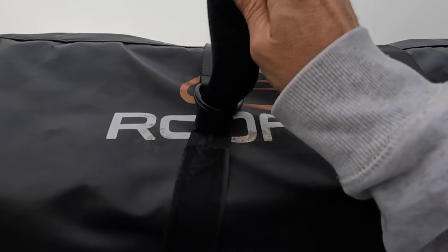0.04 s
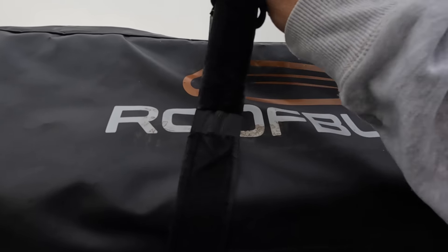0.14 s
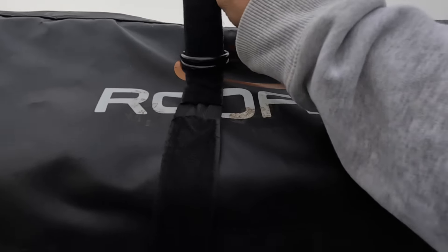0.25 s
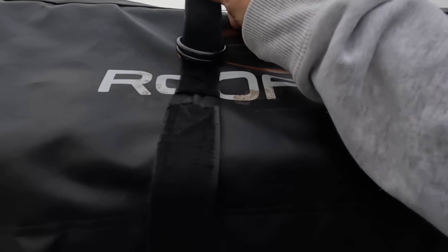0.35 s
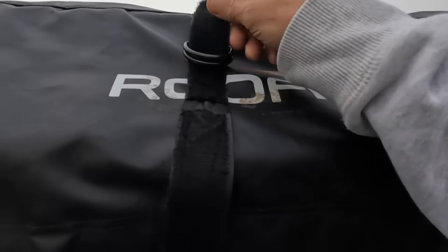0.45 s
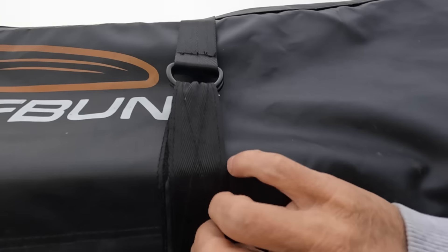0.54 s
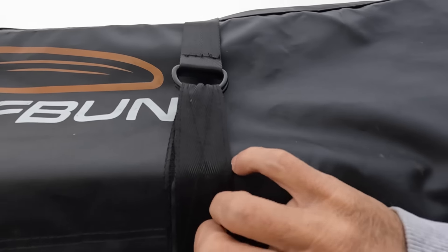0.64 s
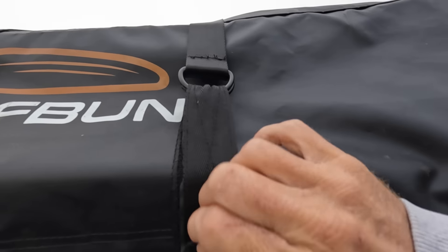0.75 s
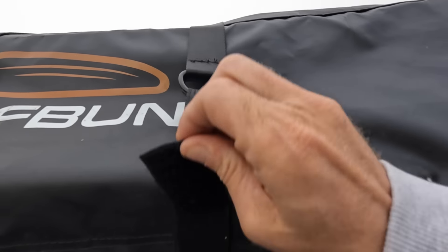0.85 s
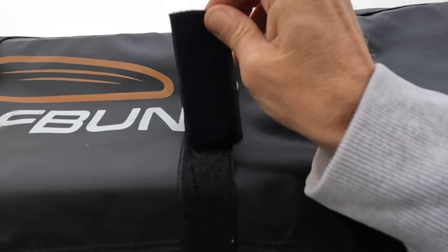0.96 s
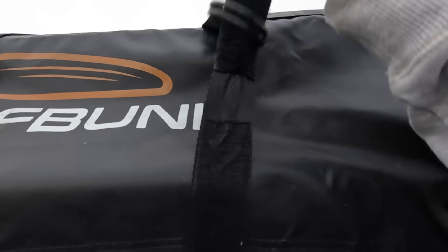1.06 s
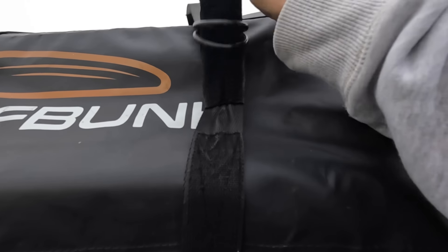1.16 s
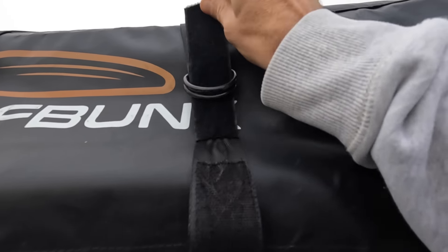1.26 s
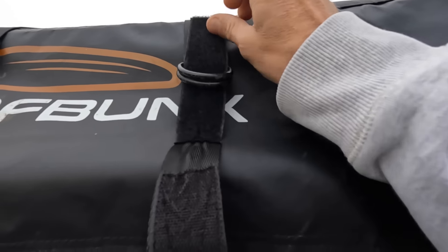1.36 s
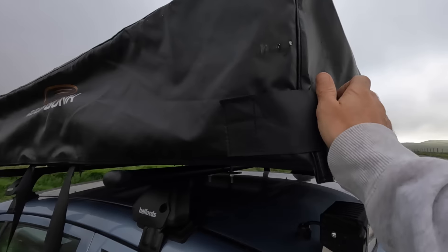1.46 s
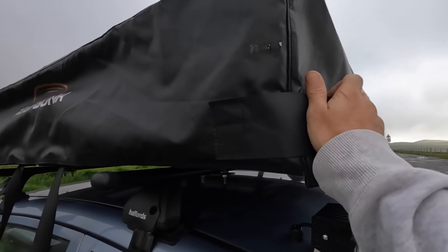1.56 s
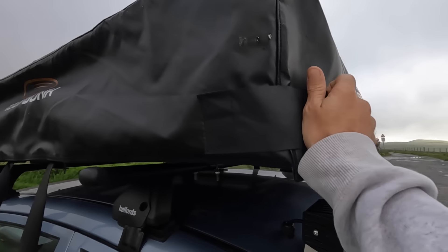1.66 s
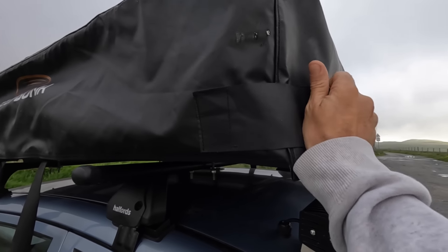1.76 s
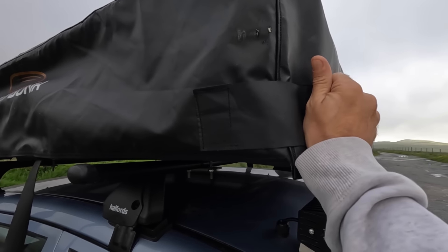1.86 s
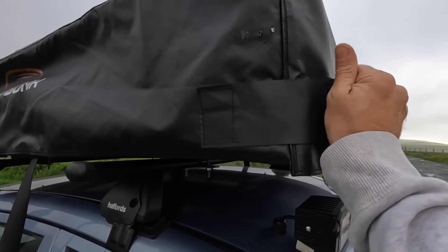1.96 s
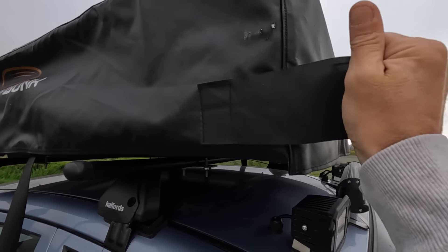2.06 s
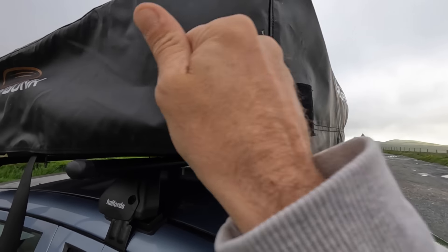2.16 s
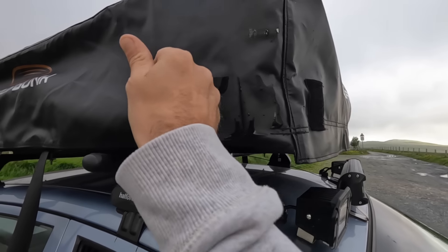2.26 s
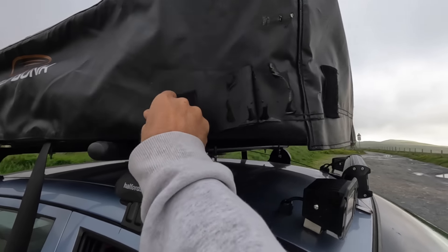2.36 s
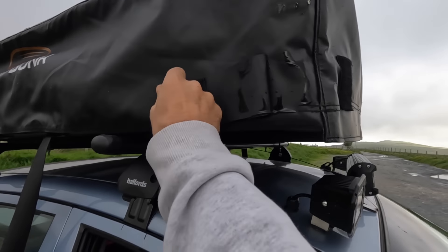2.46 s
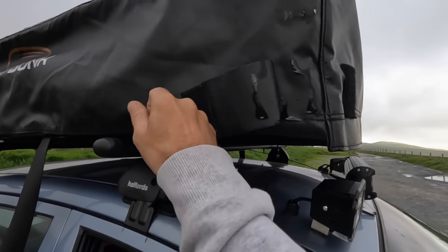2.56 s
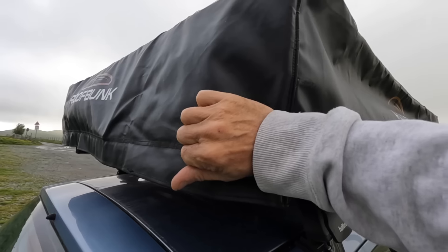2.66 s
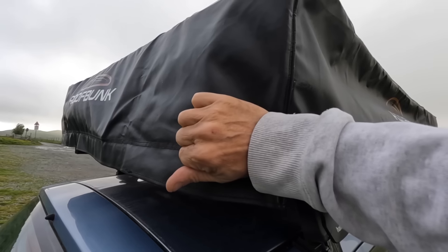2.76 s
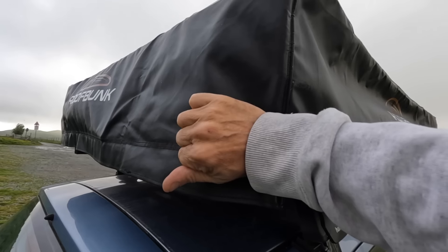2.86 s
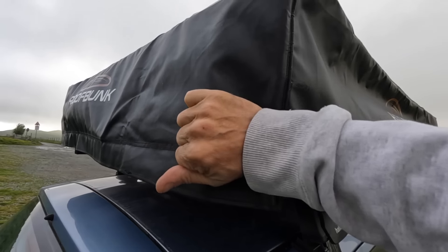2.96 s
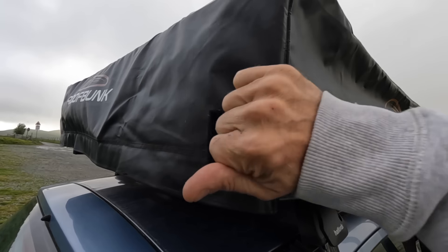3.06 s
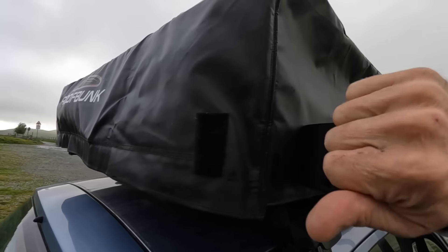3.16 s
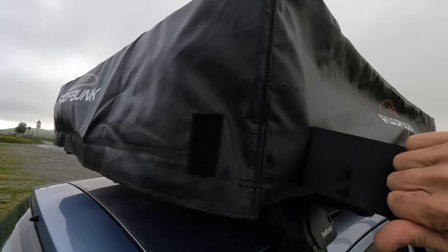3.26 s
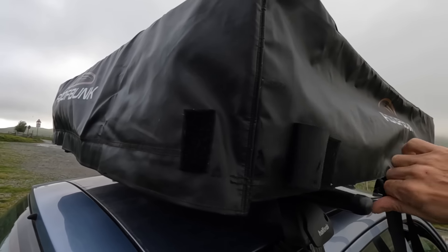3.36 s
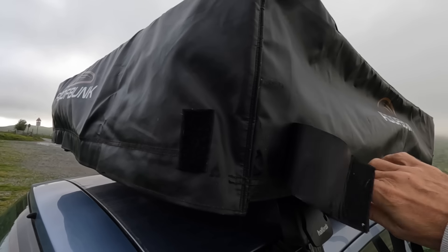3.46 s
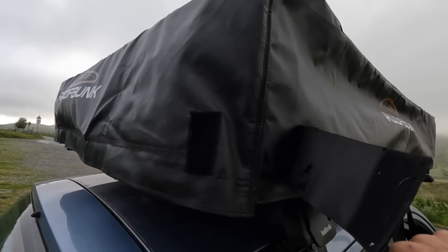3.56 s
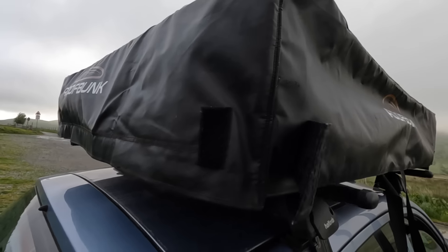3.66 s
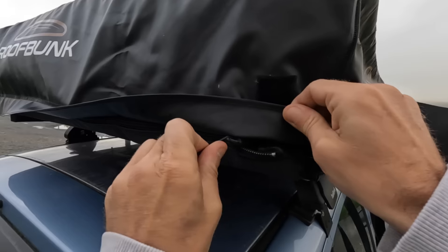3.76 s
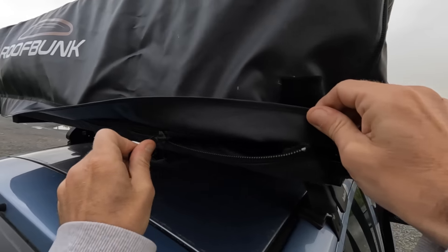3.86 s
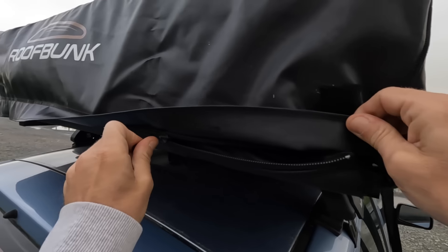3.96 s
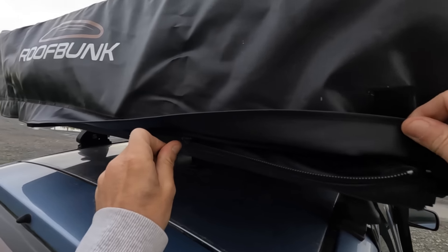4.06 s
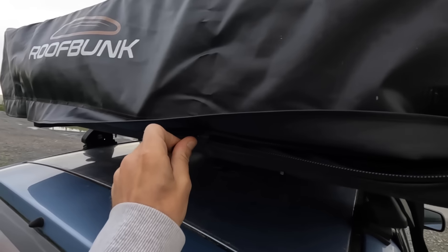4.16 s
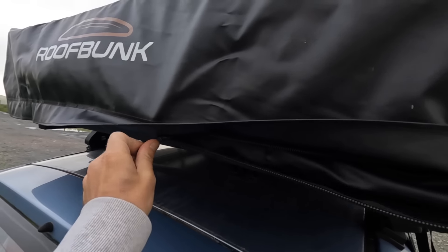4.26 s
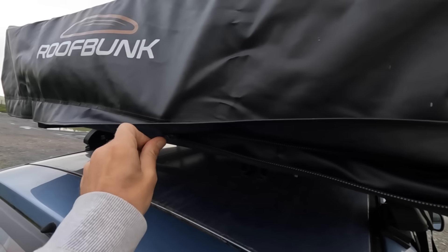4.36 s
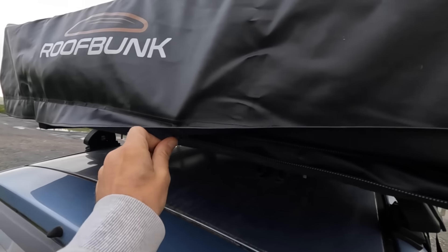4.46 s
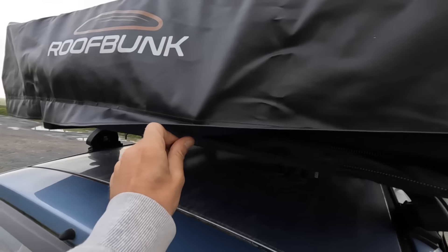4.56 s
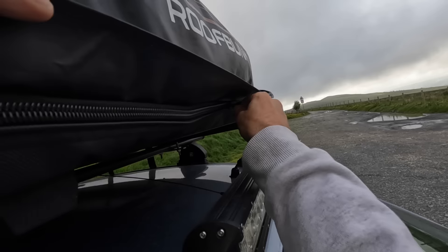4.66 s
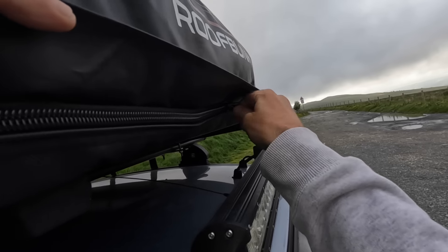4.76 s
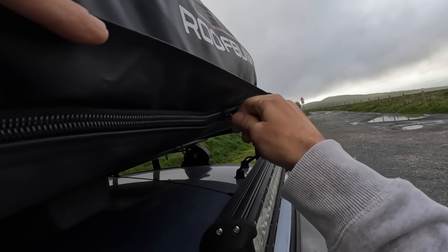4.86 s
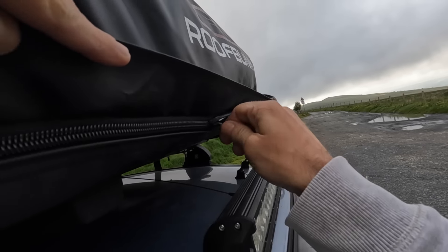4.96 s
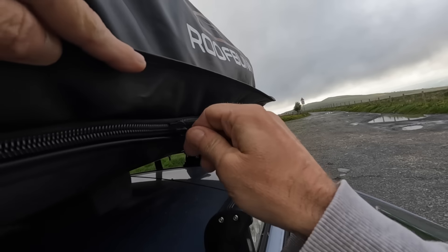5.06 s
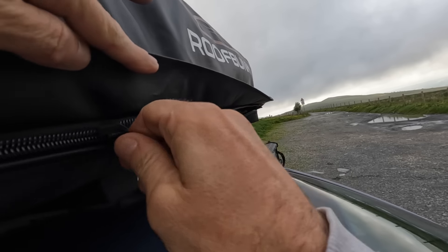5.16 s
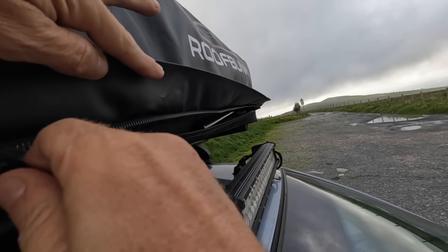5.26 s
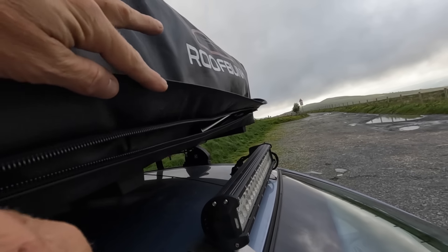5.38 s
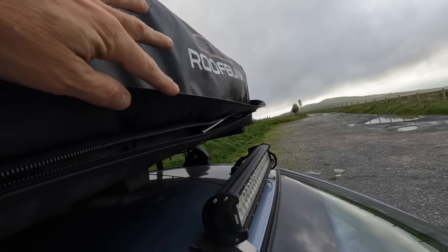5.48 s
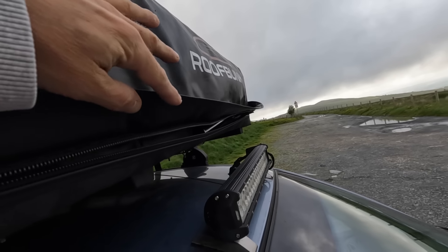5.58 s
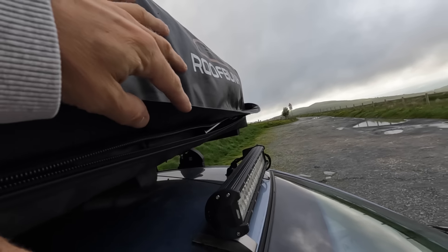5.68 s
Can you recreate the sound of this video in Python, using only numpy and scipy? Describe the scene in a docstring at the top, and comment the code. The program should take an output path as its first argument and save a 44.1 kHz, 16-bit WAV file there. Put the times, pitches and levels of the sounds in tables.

```python
"""Vinyl roof-tent cover being opened

Hook-and-loop straps and flaps tear as random hook impulses; steel rings clink as sums of decaying modes.
A coarse zip runs in two short strokes and a long one: tooth ticks gate noise, and their rate sounds as a hum.
The vinyl cover drums and rustles as filtered random impulses and thumps as falling sine bursts.
Low-pitched noise is the wind buffeting two microphone ports; brief random echoes surround the nearer sounds."""
import sys
import numpy as np
from scipy import signal
from scipy.fft import rfft, irfft, next_fast_len
from scipy.io import wavfile
from scipy.ndimage import uniform_filter1d, map_coordinates

SR = 44100
rng = np.random.default_rng(int(sys.argv[2]) if len(sys.argv) > 2 else 0)


def transcribe(signal):
    """Save signal, clipped to [-1, 1], as a 16-bit WAV file at the path in sys.argv[1]."""
    frames = np.atleast_2d(signal).T
    limited = np.clip(frames, -1, 1)
    pcm = np.round(limited * 32767).astype(np.int16)
    wavfile.write(sys.argv[1], SR, pcm)


N = 252340
T = np.arange(N) / SR  # time [s]

# tears of each fastening: (start [s], end [s], build-up [s], relative level [dB])
NARROW_TEARS = [(0.0, .156, .095, -18), (.815, 1.127, 0.036, -20)]
WIDE_TEARS = [(1.995, 2.165, .13, -17.5), (2.448, 2.494, 0.011, -30.5), (2.975, 3.031, 0.02, -27.5),
              (3.057, 3.153, 0.029, -17), (3.394, 3.428, 0.011, -24)]
TEAR_SWELL_DB, TEAR_STOP_DB_PER_S = 10, 2010  # rise during the build-up, then a steep fall after the end
# loudest single hooks letting go: (time [s], relative level [dB], pitch [Hz])
HOOK_SNAPS = [(.6994, -7, 4060), (.743, -15, 5340), (.7708, -8.5, 3780), (.7813, -12, 5230),
              (.8116, -12, 3210), (1.8434, -8, 3020), (1.8537, -6, 2780), (1.8642, -14, 2680),
              (1.8968, -2, 3600), (1.9032, -4.5, 2760), (1.9067, -10, 3580), (1.9265, -2.5, 3020),
              (1.9596, -10, 3730), (1.9872, -19, 3430), (2.0012, -9.5, 2640), (2.0168, -5.5, 3450),
              (2.0474, -0.5, 2770), (2.4723, -3.5, 2140), (2.5022, -14.5, 4020), (2.8376, -9.5, 2770),
              (2.8463, -7, 2070), (2.8681, -10, 2720), (2.9085, -9.5, 2570), (2.9504, -11, 2520),
              (2.9616, -8.5, 2730), (2.9728, -9, 2530), (2.9986, -3, 2390), (3.014, -3.5, 2370),
              (3.026, -18, 2000), (3.0384, -13.5, 3460), (3.0479, -14, 2800), (3.0595, -2, 2570),
              (3.464, -4, 3600)]

# slider speed, one list per stroke: (time [s], speed [teeth/s])
SLIDER_SPEED = [
    [(3.8, 70), (3.88, 150), (3.92, 430), (3.95, 630), (3.97, 745), (3.985, 590), (4.03, 210), (4.15, 110)],
    [(4.243, 80), (4.28, 230), (4.31, 390), (4.365, 520), (4.385, 360), (4.42, 100)],
    [(4.74, 50), (4.82, 150), (4.89, 290), (5.0, 265), (5.07, 300), (5.135, 410), (5.2, 480), (5.265, 410),
     (5.3, 270), (5.405, 415), (5.48, 180), (5.58, 165)],
]
# one row per stroke: (relative level at reference speed [dB], level drift by the end of the stroke [dB],
# hum offset [dB])
STROKE_LEVELS = [(-31.5, -2, 1.5), (-28.5, -3.5, 0.5), (-29, 6.5, -2.5)]
REFERENCE_SPEED = 400  # teeth/s
SPEED_LAW_DB = 22.5  # louder by this much at ten times the speed
SLIDE = .25  # smooth sliding added to the tooth ticks, whose nominal height is 1
# the slider passes to the left: (time [s], left minus right level [dB])
SLIDER_BALANCE = [(5.05, 0), (5.3, 2.5), (5.46, 4.5)]
# the slider catches and its tab knocks: (time [s], relative level [dB], pitch [Hz])
SLIDER_CATCHES = [(3.81, -18.5, 824), (3.883, -14, 785), (3.922, -14.5, 1060), (4.594, -10, 2060),
                  (4.679, -20.5, 750), (5.585, -6.5, 880), (5.618, -25.5, 888), (5.629, -4.5, 928),
                  (5.671, -30.5, 1030)]
# share of the scrape taken up by the loose cover: (time [s], relative level [dB])
COVER_UPTAKE = [(3.8, -12), (4.4, 2.5), (4.85, -9), (5.1, -20.5), (5.35, 2), (5.58, 7)]

# strap rings touching: (time [s], relative level [dB])
RING_CLINKS = [(0.258, -12), (1.2207, -11), (1.3422, -19)]
# modes of the steel rings: (frequency [Hz], mean relative level [dB], 60 dB decay time [s])
STEEL_MODES = [(4270, 1, 0.028), (5130, 5.5, 0.045), (5710, 0.5, 0.057), (6340, 0.5, 0.045),
               (6560, -18, .072), (7360, -8, 0.077), (7270, -17, .25), (13390, -15, 0.07),
               (14760, -14.5, 0.081)]

# the cover jerks: (time [s], relative level [dB])
COVER_THUMPS = [(.164, -12), (0.198, -13.5), (0.775, -13.5), (.833, -5.5), (2.071, -8.5), (2.181, -3),
                (2.267, -19.5), (2.474, -6), (3.147, -3.5), (3.376, -18), (3.463, -12.5), (3.81, -20),
                (3.999, -11), (5.581, -8.5), (5.625, -5)]
# a hand tugs the cover and it drums: (middle [s], length [s], relative level [dB])
HAND_TUGS = [(1.18, 0.085, -30), (2.23, 0.057, -34), (2.48, 0.021, -23), (3.44, .1, -36.5),
             (3.85, 0.058, -25), (4.15, 0.35, -29.5), (4.85, 0.24, -33.5), (5.58, 0.16, -27.5)]
# the sleeve brushes the vinyl: (middle [s], length [s], relative level [dB])
SLEEVE_BRUSHES = [(.21, 0.088, -40), (.365, 0.044, -45), (.53, 0.1, -47), (.76, 0.086, -42.5),
                  (1.19, 0.055, -36.5), (1.4, 0.11, -42.5), (1.585, 0.054, -44), (1.76, 0.13, -44),
                  (1.92, 0.094, -42), (2.26, 0.093, -52), (2.48, 0.072, -37.5), (2.85, 0.073, -52),
                  (2.99, 0.074, -47.5), (3.25, 0.084, -66.5), (3.41, 0.06, -37.5), (3.59, 0.028, -59),
                  (4.19, 0.066, -60), (4.62, .11, -43.5)]
RESTING_RUB_DB, RESTING_WANDER_DB = -63, 3  # the cover never lies quite still
# drumming offset for each kind of excitation
DRUM_BY_STRAP_DB, DRUM_BY_FLAP_DB, DRUM_BY_BRUSH_DB = 0.5, -9, 7
# small dry ticks: (time [s], relative level [dB])
DRY_TICKS = [(1.166, -22), (1.4047, -37), (1.489, -17), (2.3327, -30), (2.6365, -33.5), (2.687, -40),
             (2.7811, -30), (3.333, -39), (3.548, -19), (3.5985, -20.5)]
TICK_HZ = 3840

# wind buffeting: (time [s], relative level [dB])
WIND_LEVEL = [(0.0, -26.5), (0.54, -36.5), (1.15, -26.5), (1.45, -40.5), (1.53, -20.5), (2.02, -43),
              (2.17, -24.5), (2.44, -49.5), (2.47, -22), (2.6, -45.5), (2.8, -33), (2.93, -46.5),
              (3.17, -28), (3.23, -41), (3.44, -29), (3.53, -37.5), (4.08, -26), (4.97, -34), (5.11, -21.5),
              (5.19, -38), (5.24, -30), (5.53, -37.5), (5.58, -26.5), (5.72, -43.5)]
# spans in which the nearly mono sound opens to stereo: (start [s], end [s])
STEREO_SPANS = [(1.46, 3.78), (4.68, 5.73)]

# source spectra: (frequency [Hz], relative density [dB per Hz])
NARROW_SPECTRUM = [(260, -38.5), (450, -3.5), (589, -13), (684, -6), (748, -12), (1560, -7.5), (1780, -10),
                   (3090, -2.5), (3990, -4), (4560, -3.5), (7690, -11), (9630, -23), (12600, -22),
                   (15100, -34), (16000, -41.5)]
WIDE_SPECTRUM = [(180, -8.5), (300, -8), (713, -5.5), (787, -9.5), (994, -2), (1690, -5), (1810, -2.5),
                 (2400, -1.5), (3350, -1.5), (4750, -7.5), (5900, -7.5), (11300, -22.5), (12900, -35),
                 (16000, -54.5)]
RASP_SPECTRUM = [(290, -51.5), (500, -24.5), (562, -22), (855, -6.5), (919, -3), (1130, -3.5), (1690, -6),
                 (1840, -5), (2290, -6.5), (4470, -17.5), (7420, -24), (8960, -33), (12000, -39.5),
                 (14000, -51.5), (16000, -55)]
VINYL_SPECTRUM = [(350, -47), (600, -5.5), (1160, 1.5), (1460, -2), (2070, -3), (5250, -5.5),
                  (10000, -20.5), (13700, -31.5), (15000, -62)]
DRUM_SPECTRUM = [(50, -40.5), (100, 0), (160, 1), (300, -8), (450, -16), (800, -26), (2000, -68),
                 (6000, -120)]
BUFFET_SPECTRUM = [(10, -1), (25, 3), (45, -3), (80, -6.5), (130, -18), (300, -42), (1000, -73.5),
                   (4000, -120)]
AIR_SPECTRUM = [(120, -27), (200, 24), (443, -23), (818, -19.5), (2850, -20.5), (4980, -42), (12300, -31),
                (15000, -52)]
# slider scrape as it sounds in the cover: (frequency [Hz], relative density [dB per Hz])
BODY_SPECTRUM = [(150, -24.5), (400, -23.5), (800, -3), (1200, -8.5), (2000, -14), (5000, -41),
                 (12000, -100)]
# stray sound that differs between the ports: (frequency [Hz], gain [dB])
SCATTER_GAIN = [(100, -20), (500, -11), (2000, -10.5), (5000, -9.5), (8000, -17), (12000, 1.5)]
# how well the cover radiates the hum: (frequency [Hz], gain [dB])
PANEL_GAIN = [(150, 7.5), (280, -1), (450, -2.5), (580, -4), (750, 1.5), (930, 8), (1200, 0), (2000, -2.5),
              (4000, -8)]
# softening of every click by the fabric: (frequency [Hz], gain [dB])
FABRIC_DAMPING = [(100, -30), (500, 0), (7000, -1), (12000, -4), (16000, -19.5)]
TOP_HZ, CEILING = 16000, .75  # band limit, and the amplitude to which peaks are rounded


def amp(db):
    """Logarithmic level: decibels become an amplitude ratio."""
    return 10 ** (np.asarray(db) / 20)


def unit(x):
    """Power normalisation: scale to an rms of 1."""
    return x / np.sqrt(np.mean(x ** 2) + 1e-20)


def along(points, hz):
    """Logarithmic frequency scale: interpolate (frequency [Hz], value) points."""
    f, v = np.transpose(points)
    return np.interp(np.log(hz + 1), np.log(f + 1), v)


def level(rows):
    """Amplitude envelope: (time [s], level [dB]) rows become a gain, falling to -120 dB outside them."""
    db = np.interp(T, *np.transpose(rows), left=-120, right=-120)
    return uniform_filter1d(amp(db), size=90)


def wobble(rate):
    """Slow random modulation: a smooth curve through random knots, rate of them a second."""
    return map_coordinates(rng.standard_normal(int(N * rate / SR) + 4), [T * rate])


def colour(x, spectrum):
    """Minimum-phase filtering: a causal response is found by folding the cepstrum of the spectrum."""
    m = 2 * next_fast_len(N // 2 + 8192)
    gain = amp(along(spectrum, np.fft.rfftfreq(m, 1 / SR)))
    cepstrum = irfft(np.log(gain + 1e-6))
    cepstrum[1:m // 2] *= 2
    cepstrum[m // 2 + 1:] = 0
    return irfft(rfft(x, m) * np.exp(rfft(cepstrum)), m)[..., :N]


def noise(spectrum):
    """Coloured noise: filtered Gaussian noise with an rms of 1."""
    return unit(colour(rng.standard_normal(N), spectrum))


def crackle(rate, spread_db):
    """Poisson-like shot noise: sparse impulses of uneven size, with power held level as the rate varies."""
    sizes = amp(spread_db * np.clip(rng.standard_normal(N), -2, 2))
    signed = sizes * rng.choice([-1, 1], N)
    return unit(signed * (rng.random(N) < rate / SR) / np.sqrt(rate))


def shifting(x, depth_db, size, count):
    """Moving resonance: flexing fabric gives random gain patches, size bins wide and count frames long."""
    z = signal.stft(x, nperseg=256)[2]
    field = uniform_filter1d(rng.standard_normal(z.shape), size, 0)
    field = uniform_filter1d(field, count, 1)
    return unit(signal.istft(z * amp(depth_db * unit(field)), nperseg=256)[1][:N])


def add(track, s, sound):
    """Superposition: add a sound to the track at time s."""
    part = track[max(round(s * SR), 0):][:len(sound)]
    part += sound[:len(part)]


def place(x, lag, pan_db):
    """Interaural-style cues: the left port lags by some samples and is louder by pan_db."""
    turn = np.exp(-1j * np.pi * np.fft.rfftfreq(N) * lag)
    left, right = irfft(rfft(x) * np.array([turn, 1 / turn]), N)
    return np.array([left * amp(pan_db / 2), right * amp(-pan_db / 2)])


def swells(moves):
    """Gaussian envelopes: hand movements swell and fade evenly."""
    return sum(amp(db) * np.exp(-2 * ((T - middle) / length) ** 2) for middle, length, db in moves)


def tearing(tears):
    """Peeling force: the pull on the hooks builds, holds and stops when the strip comes free."""
    pull = np.zeros(N)
    for start, end, build, db in tears:
        rise_db = TEAR_SWELL_DB * np.clip((T - start) / build - 1, -1, 0)
        fall_db = TEAR_STOP_DB_PER_S * np.maximum(T - end, 0)
        pull += (T >= start) * amp(db + rise_db - fall_db)
    return pull


def tear(tears, spectrum, hook_rate, spread_db, clump_db, fuzz, shift_db):
    """Stochastic fracture: hooks let go in clumps over a fuzz of loops, faster under a harder pull."""
    pull = tearing(tears)
    rate = hook_rate * np.clip(pull / pull.max(), .03, 1) ** 1.4
    hooks = crackle(rate, spread_db) + fuzz * rng.standard_normal(N)
    clumped = hooks * amp(clump_db * wobble(330))
    return pull * shifting(colour(clumped, spectrum), shift_db, size=4, count=16)


def clicks(events, ring_t60, grit, tail_db, tail_t60, spectrum):
    """Impulsive excitation: each event gives a decaying sine with grit and a short noise rattle."""
    out, t = np.zeros(N), np.arange(SR // 20) / SR
    rough = noise(spectrum)
    for s, db, hz in events:
        rattle = rough[rng.integers(N - len(t)):][:len(t)]
        click = (np.sin(2 * np.pi * hz * t) + grit * rattle) * amp(-60 * t / ring_t60)
        click += rattle * amp(tail_db - 60 * t / tail_t60)
        # every onset falls about 1 ms after its listed time
        add(out, s + 0.001056, amp(db) * click / np.abs(click).max())
    return colour(out, FABRIC_DAMPING)


def straps(ring_hz=3750, width_hz=500, ring_db=-5):
    """Resonant fracture: two narrow straps rip straight ahead, and their taut webbing rings."""
    rip = tear(NARROW_TEARS, NARROW_SPECTRUM, hook_rate=4500, spread_db=3.0, clump_db=1.0,
               fuzz=0.27, shift_db=3.5)
    ring = signal.lfilter(*signal.iirpeak(ring_hz, ring_hz / width_hz, SR), rip)
    return np.tile(amp(-1) * rip + amp(ring_db) * ring, (2, 1))


def cover_thumps():
    """Membrane relaxation: the pitch of each decaying sine sags as the panel goes slack."""
    thumps, t = np.zeros(N), np.arange(SR // 10) / SR
    for s, db in COVER_THUMPS:
        hz = (135 + 420 * np.exp(-t / 0.0025)) * amp(rng.normal(0, 1.6))
        thump = np.sin(2 * np.pi * np.cumsum(hz) / SR)
        add(thumps, s + 0.0013, amp(db - 5.5 - 60 * t / .021) * thump)  # onset 1.3 ms late
    return thumps


def cover():
    """Membrane and friction noise: the vinyl drums when shaken, thumps and hisses; small dry ticks fall among
    its sounds."""
    brushing = swells(SLEEVE_BRUSHES) + amp(RESTING_RUB_DB + RESTING_WANDER_DB * wobble(8.6))
    ripping = amp(DRUM_BY_STRAP_DB) * tearing(NARROW_TEARS) + amp(DRUM_BY_FLAP_DB) * tearing(WIDE_TEARS)
    shaking = swells(HAND_TUGS) + ripping + amp(DRUM_BY_BRUSH_DB) * brushing
    drum = shaking * unit(colour(crackle(450, spread_db=5.5), DRUM_SPECTRUM))
    fibres = crackle(2500, spread_db=12.0) + 0.86 * rng.standard_normal(N)
    rub = brushing * shifting(colour(fibres, VINYL_SPECTRUM), depth_db=2.5, size=9, count=40)
    tick_events = [(s, db, TICK_HZ) for s, db in DRY_TICKS]
    ticks = amp(-1) * clicks(tick_events, ring_t60=0.0018, grit=0.76, tail_db=-11.5, tail_t60=.024,
                             spectrum=WIDE_SPECTRUM)
    return place(amp(-3) * drum + amp(-3) * rub + ticks + cover_thumps(), lag=0.91, pan_db=-.5)


def scatter(x, t60=.018, late_db=-18, late_t60=.17):
    """Diffuse reflection: car and cover return a brief echo, different at each port; ground adds a tail."""
    t = np.arange(SR // 6) / SR
    decay = amp(-60 * t / t60) + amp(late_db - 60 * t / late_t60)
    echo = rng.standard_normal((2, len(t))) * decay
    reflected = signal.fftconvolve(x, echo / np.linalg.norm(echo[0]), axes=1)[:, :N]
    return colour(reflected, SCATTER_GAIN)


def wind():
    """Turbulent pressure: gusts buffet the ports, partly each on its own, over a faint outdoor hush."""
    own = np.array([noise(BUFFET_SPECTRUM), noise(BUFFET_SPECTRUM)])
    buffets = unit(noise(BUFFET_SPECTRUM) + 0.4 * own)
    return amp(2.0) * level(WIND_LEVEL) * buffets + amp(-59.5) * noise(AIR_SPECTRUM)


def rings():
    """Modal vibration: steel rings clatter, each contact striking the modes at new strengths."""
    out, t = np.zeros(N), np.arange(SR // 3) / SR
    for s, db in RING_CLINKS:
        ring = np.zeros(len(t))
        for hz, mode_db, t60 in STEEL_MODES:
            decay = amp(mode_db + rng.normal(0, 2.5) - 60 * t / t60)
            ring += decay * np.sin(2 * np.pi * hz * t + rng.uniform(0, 2 * np.pi))
        # a short noise burst at the contact
        ring += 1.73 * noise(NARROW_SPECTRUM)[:len(t)] * amp(-60 * t / 0.028)
        add(out, s + 0.0013, amp(db - 2.5) * ring / np.abs(ring).max())  # onset 1.3 ms late
    return np.tile(out, (2, 1))


def flaps():
    """Progressive fracture: the wide flaps tear densely, and single hooks of strap and flaps snap."""
    rip = amp(-0.5) * tear(WIDE_TEARS, WIDE_SPECTRUM, hook_rate=3200, spread_db=3.5, clump_db=1.5,
                           fuzz=.28, shift_db=1.5)
    snaps = amp(-1) * clicks(HOOK_SNAPS, ring_t60=0.004, grit=0.63, tail_db=-20, tail_t60=0.045,
                             spectrum=WIDE_SPECTRUM)
    return place(rip + snaps, lag=0.72, pan_db=-1.1)


def slider_force():
    """Power law of speed: rasp and hum grow as the slider runs faster, with a level drift per stroke."""
    force, hum = np.zeros(N), np.zeros(N)
    for pull, (db, drift_by_end_db, hum_db) in zip(SLIDER_SPEED, STROKE_LEVELS):
        s, speed = np.transpose(pull)
        speed_db = SPEED_LAW_DB * np.log10(speed / REFERENCE_SPEED)
        drift_db = drift_by_end_db * (s - s[0]) / (s[-1] - s[0])
        gain = level(np.column_stack([s, db + speed_db + drift_db]))
        force += gain
        hum += gain * amp(hum_db)
    return force, hum


def tooth_scrape(teeth, speed, tooth_db=-3.0, tick_s=0.0022):
    """Periodic impact: slow teeth are heard one by one, fast ones merge into a rasp."""
    heights = amp(tooth_db * rng.standard_normal(N))[teeth.astype(int)]
    ticks = heights * np.exp(-(teeth % 1) / speed / tick_s) + SLIDE
    scrape = ticks / np.sqrt(uniform_filter1d(ticks ** 2, size=1500)) * rng.standard_normal(N)
    # each tooth also strikes the slider with one sharp click
    strikes = np.diff(np.floor(teeth), prepend=0) * rng.standard_normal(N) / np.sqrt(speed)
    return scrape + 0.43 * unit(strikes)


def tooth_hum(teeth, speed, slip=0.02, fall_db=6.0, flutter_db=3, count=6):
    """Harmonic radiation: the cover sounds the tooth rate as a gliding hum with overtones."""
    # uneven teeth blur the upper overtones, and the limp vinyl swallows them
    phase = 2 * np.pi * (teeth + slip * wobble(500))
    hum = np.zeros(N)
    for k in range(1, count + 1):
        gain_db = along(PANEL_GAIN, k * speed) - fall_db * (k - 1) + flutter_db * wobble(40)
        hum += amp(gain_db) * np.sin(k * phase)
    return np.sqrt(2) * hum


def zipper(jitter=.025):
    """Impact-driven radiation: teeth tick through the slider as rasp, hollow cover sound, drag and hum."""
    speed = np.interp(T, *np.concatenate(SLIDER_SPEED).T) * (1 + jitter * wobble(100))
    teeth = np.cumsum(speed) / SR  # running tooth count
    scrape = tooth_scrape(teeth, speed)
    rasp = shifting(colour(scrape, RASP_SPECTRUM), depth_db=1, size=3, count=20)
    hollow = level(COVER_UPTAKE) * unit(colour(scrape, BODY_SPECTRUM))
    drag = amp(-7.5) * noise(DRUM_SPECTRUM)
    hum = tooth_hum(teeth, speed)
    catches = amp(-3) * clicks(SLIDER_CATCHES, ring_t60=0.011, grit=1.0, tail_db=3.5, tail_t60=0.025,
                               spectrum=RASP_SPECTRUM)
    force, hum_force = slider_force()
    running = force * (amp(0.9) * rasp + hollow + drag) + hum_force * hum
    unsteady = amp(2.2 * wobble(35)) * running
    return place(unsteady + catches, lag=0.31, pan_db=np.interp(T, *np.transpose(SLIDER_BALANCE)))


def scene():
    """Superposition of sources within arm's reach; those on the tent's side also glance off the car roof."""
    tent_side = flaps() + zipper() + cover()
    return straps() + rings() + tent_side + scatter(tent_side) + wind()


def narrowed(x, mono_db=-24, split_hz=11500, top_db=-1):
    """Mid-side width: outside the stereo spans the image is nearly mono save for its highest treble."""
    mid, side = (x[0] + x[1]) / 2, (x[0] - x[1]) / 2
    spans = sum(1.0 * ((T > start) & (T < end)) for start, end in STEREO_SPANS)
    wide = uniform_filter1d(spans, size=900)
    top = irfft(rfft(mid) * (np.fft.rfftfreq(N, 1 / SR) > split_hz), N)
    side = wide * side + (1 - wide) * (amp(mono_db) * side - amp(top_db) * top)
    return np.array([mid + side, mid - side])


def record(dry):
    """Saturation and band limiting: the image narrows at times, high peaks round off, top treble is cut."""
    ports = narrowed(dry)
    rounded = ports / (1 + np.abs(ports / CEILING) ** 6) ** (1 / 6)
    return irfft(rfft(rounded) * (np.fft.rfftfreq(N, 1 / SR) < TOP_HZ), N)


dry = scene()
out = record(dry)
transcribe(out)
```